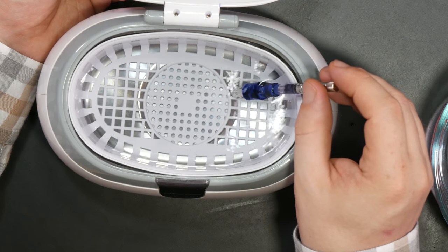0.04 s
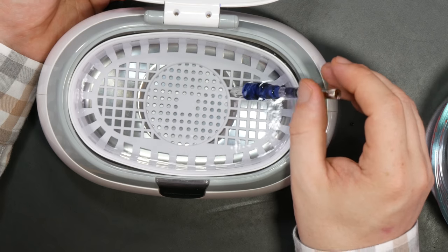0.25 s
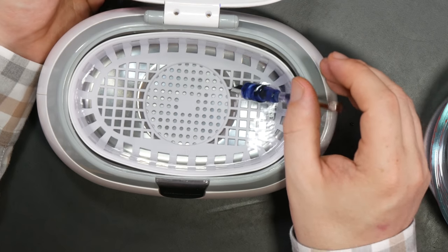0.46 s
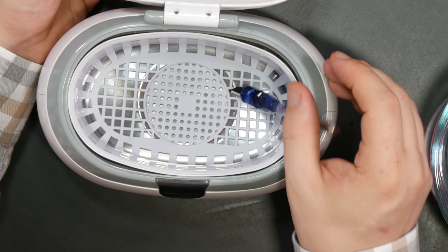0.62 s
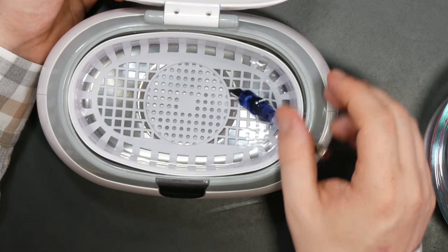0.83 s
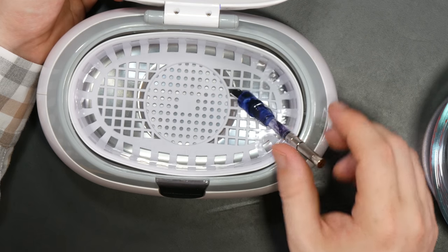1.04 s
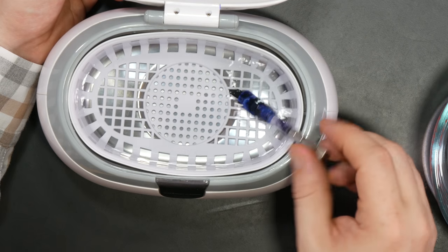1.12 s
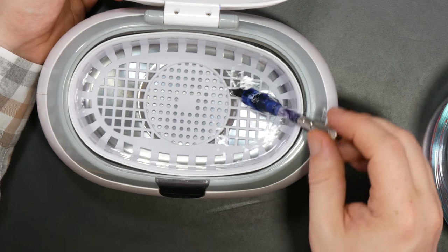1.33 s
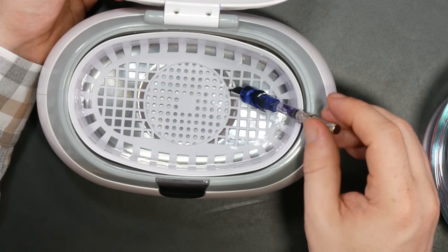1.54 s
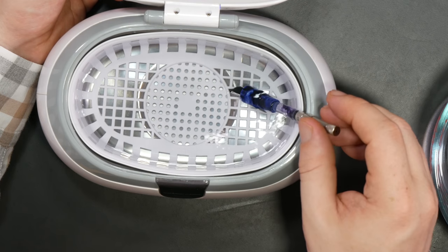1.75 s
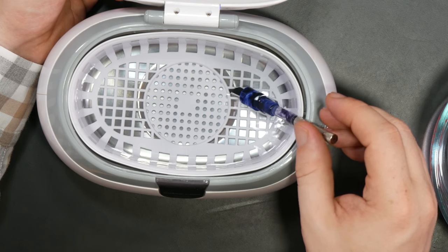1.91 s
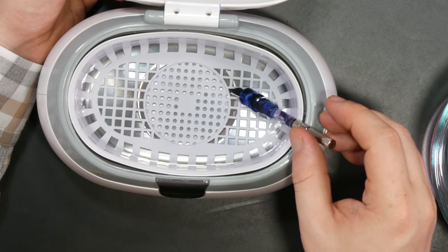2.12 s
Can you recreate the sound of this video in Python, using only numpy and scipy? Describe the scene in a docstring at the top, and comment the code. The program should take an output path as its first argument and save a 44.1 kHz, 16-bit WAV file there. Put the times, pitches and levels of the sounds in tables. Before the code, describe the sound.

Harsh electric sizzling from a water-filled ultrasonic cleaner runs throughout, its lower buzz shifting as a hand moves a pen in it. Small clicks, plops, faint scrapes and dull bumps; close and dry indoors.

```python
"""Hiss buzzing at the mains rate, with a touch and soft plops: a small ultrasonic cleaner, a pen held in its tank.
The drive swells once per mains cycle: each swell gates random bubble collapses into a burst of hiss,
adds a short whine, a nearly repeating noise pattern as rattle, and a kick to the tank's modes.
The hand adds rising-sine plops, noise touches, scrapes and bumps, and ringing notes.
A short noise tail makes the room; mains hum and room air lie beneath."""
import sys
import numpy as np
from scipy import signal
from scipy.fft import rfft, irfft, next_fast_len
from scipy.io import wavfile

SR = 44100
rng = np.random.default_rng(int(sys.argv[2]) if len(sys.argv) > 2 else 0)


def inscribe(sig):
    """Save sig as 16-bit PCM at rate SR to the path in sys.argv[1].

    A 1-D sig is mono; a 2-D sig holds one channel per row.
    Samples are clipped to [-1, 1] before scaling.
    """
    pcm = np.round(np.clip(np.atleast_2d(sig).T, -1, 1) * 32767)
    wavfile.write(sys.argv[1], SR, pcm.astype(np.int16))


N = 95829
T = np.arange(N) / SR

# Source levels are relative, ahead of the mix and room scaling. Spectra are relative densities.
# mains hum: [multiple of mains, level/dB]
HUM_HARMONICS = [(1, -87), (5, -88), (13, -79.5)]
# room air spectrum: [f/Hz, level/dB]
AIR_SPECTRUM = [(20, 0), (70, -3), (200, -11), (500, -18), (1500, 0), (8000, -24)]
# water plops: [t/s, level/dB, starting f/Hz]
PLOP_EVENTS = [(.009, -38, 289), (.013, -36.5, 697), (1.409, -49.5, 652), (1.432, -38.5, 392),
               (1.440, -41, 603)]
# pen touches the basket: [t/s, level/dB]
TOUCH_EVENTS = [(.003, -28.5), (0.367, -47.5), (1.336, -44), (1.408, -52), (1.432, -35), (1.554, -45.5)]
# touch spectrum: [f/Hz, level/dB]
TOUCH_SPECTRUM = [(100, -72), (260, -5), (700, 1.5), (1000, 2), (1300, -5), (1600, -2), (2250, -7),
                  (3000, -12), (6000, -4)]
# pen slides: [t/s, level/dB, width/s]
SCRAPE_EVENTS = [(0.528, -54, .05), (0.697, -53.5, 0.071), (1.428, -48.5, 0.053)]
# scrape spectrum: [f/Hz, level/dB]
SCRAPE_SPECTRUM = [(100, -20), (300, 1.5), (430, -4.5), (680, 3.5), (950, 0), (1500, -2), (2270, 9.5),
                   (2700, -24), (6000, -32)]
# hand bumps the case: [t/s, level/dB, bell width/s]
BUMP_EVENTS = [(0.466, -67, .012), (0.524, -52.5, 0.0078), (0.791, -59.5, 0.021), (1.167, -67.5, 0.018),
               (1.46, -61, 0.012), (1.546, -54, 0.028)]
# bump spectrum: [f/Hz, level/dB]
BUMP_SPECTRUM = [(25, -17), (60, -8), (120, 10.5), (200, -1), (330, -10), (600, -25), (2000, -61)]
# tank and basket notes set ringing by the pen: [t/s, level/dB, f/Hz, t60/s]
PING_EVENTS = [(.012, -52.5, 298.2, 0.55), (1.337, -32, 2236, 0.055), (1.435, -46, 302, .15)]
# tank modes: [f/Hz, level/dB, t60/s]
MODES = [(1690, -7, .018), (1830, 1, .02), (2290, -1, .022), (2520, -4, .02), (2800, -2, .022),
         (3180, 5, .03), (3900, 6, .014), (4230, 5, .014), (4650, 4, .014)]
# whine and high rattle over time: [t/s, level/dB]
RING_OVER_TIME = [(0.0, -43), (0.56, -36.5), (1.0, -43), (1.29, -46), (1.3, -37), (1.53, -38.5),
                  (1.63, -46), (1.86, -37.5), (2.15, -39.5), (2.17, -39)]
# low buzz over time, changing with the grip on the pen: [t/s, level/dB]
BUZZ_OVER_TIME = [(0.01, -40), (0.24, -43), (0.42, -37.5), (0.69, -39.5), (0.94, -51.5), (1.05, -45),
                  (1.15, -50.3), (1.2, -40.5), (1.25, -44), (1.42, -37.5), (1.55, -40.5), (1.64, -50.0),
                  (1.84, -46), (2.15, -45)]
# lowest part of the buzz over time: [t/s, level/dB]
DRONE_OVER_TIME = [(0.01, -39.5), (0.26, -60), (0.39, -43), (0.46, -52), (0.5, -42), (0.77, -48.5),
                   (0.84, -58), (0.97, -67.5), (1.47, -47.5), (1.64, -59), (1.77, -88), (1.85, -59.5),
                   (2.15, -61.5)]
# high rattle spectrum: [f/Hz, level/dB]
RATTLE_HIGH_SPECTRUM = [(2000, -46), (2900, -9), (3200, 2), (3400, -4), (3900, 6.5), (4200, 1), (4400, -1),
                        (4700, 2.5), (5100, -23.5), (7000, -43)]
# low rattle spectrum: [f/Hz, level/dB]
RATTLE_LOW_SPECTRUM = [(500, -44), (1000, -20), (1500, -14.5), (1800, 1), (2050, -2), (2300, 2),
                       (2850, -6.5), (3600, -12.5)]
# drone spectrum: [f/Hz, level/dB]
DRONE_SPECTRUM = [(60, -16), (200, -28), (300, -16), (500, -13), (750, -8), (950, -10), (1150, 2.5),
                  (1550, -3.5), (2200, -13)]
# cavitation strength over time: [t/s, level/dB]
CAVITATION_OVER_TIME = [(0.01, -21.5), (0.27, -22.5), (0.41, -21), (0.94, -23), (1.07, -22.1), (1.1, -23.5),
                        (1.49, -21), (1.57, -22), (1.67, -25.8), (1.74, -22.4), (1.8, -24), (1.87, -20.5),
                        (1.9, -23.5), (2.04, -19.5), (2.1, -23.5), (2.15, -22.5)]
# single bursts that flare up: [t/s, gain/dB]
FLARE_EVENTS = [(.038, 2.5), (.105, 1), (.172, 1.5), (.272, 1), (.405, 0.7), (.538, 0), (.572, 1.5),
                (1.472, 1.5), (1.572, 3), (1.588, 3.5), (1.722, 3.5), (1.955, 3.5)]
# hiss spectrum: [f/Hz, level/dB]
HISS_SPECTRUM = [(300, -54), (1200, -38), (2300, -23), (4100, -13), (5300, -16.5), (6000, -9), (6300, -12),
                 (7400, -10), (8000, -10.5), (9500, -6), (9950, -2), (10250, -2.7), (10700, 0),
                 (11450, -3.7), (12450, -3), (12850, -1.3), (13300, -2.8), (13750, -2.8), (14700, -6.5),
                 (15700, -8.3)]

MAINS_HZ, FIRST_SWELL_S = 60.026, 0.0052
ROOM_T60_S, ROOM_DELAY_S = 0.16, 0.007
HISS_ROOM_DB, TANK_ROOM_DB, HANDLING_ROOM_DB = -14.5, -10, -5
AIR_DB, CUTOFF_HZ = -82, 15820
PLOP_RISE_PER_S, PLOP_ATTACK_S, PLOP_DECAY_S = 17.5, 0.0013, 0.011  # rise: fraction of starting pitch
TOUCH_ATTACK_S, TOUCH_DECAY_S = 0.002, 0.016
SCRAPE_GRAINS_PER_S = 1100
RATTLE_HALF_S, RATTLE_LAG_S, RATTLE_TAIL_S, RATTLE_TAIL_DB = 0.0047, 0.0001, 0.009, -4.5
RATTLE_HIGH_DB, RATTLE_LOW_DB, DRONE_DB = -3, -4.5, -4.5
WHINE_HZ, WHINE_LEAD_S, WHINE_WIDTH_S, WHINE_DB = 3928, 0.0024, 0.0013, -2.5
KICK_LAG_S, KICK_DB, KICK_SPREAD = 0.003, -4.5, 0.17
BURST_WIDTH_S, BURST_SKIRT_S, SKIRT_LAG_S, SKIRT_DB = 0.0021, 0.0029, 0.00037, -2.5
SWITCH_ON_LEAD_S, SWITCH_RISE_S = 0.0048, 0.000083
COLLAPSES_PER_S, COLLAPSE_SPREAD_DB = 22000, 2.5
BURST_SPREAD_DB, BURST_PATCHY_DB, HISS_DB = 0.25, 0.9, -2


def from_db(db):
    """Decibels to gain."""
    return 10 ** (np.asarray(db) / 20)


def rms_one(x):
    """Scale to unit power."""
    return x / np.sqrt(np.mean(x ** 2) + 1e-20)


def level(rows):
    """Gain over time, interpolated in dB."""
    return from_db(np.interp(T, *np.transpose(rows)))


def bell(x, width):
    """Gaussian of height 1 and standard deviation width."""
    return np.exp(-.5 * (x / width) ** 2)


def noise():
    """White noise over the whole scene."""
    return rng.standard_normal(N)


def colour(x, spectrum):
    """Minimum-phase filter from a folded cepstrum; output rms 1."""
    size = 2 * next_fast_len(N)
    hz, db = np.transpose(spectrum)
    bins_hz = np.arange(size // 2 + 1) * SR / size
    gain = from_db(np.interp(np.log(bins_hz + 1), np.log(hz), db))
    cepstrum = irfft(np.log(gain))
    cepstrum[1:size // 2] *= 2
    cepstrum[size // 2 + 1:] = 0
    response = np.exp(rfft(cepstrum))
    return rms_one(irfft(rfft(x, size) * response)[:N])


def ring(kicks, hz, t60_s):
    """One decaying mode: a two-pole resonator."""
    radius = from_db(-60 / (t60_s * SR))
    w = 2 * np.pi * hz / SR
    return signal.lfilter([0, np.sin(w)], [1, -2 * radius * np.cos(w), radius ** 2], kicks + 1e-18)


def in_room(x, wet_db):
    """Add a decaying noise tail, scaled to about the same power."""
    t = T[:SR // 2]
    tail = rng.standard_normal(len(t)) * from_db(-60 * t / ROOM_T60_S) * (t > ROOM_DELAY_S)
    wet = signal.fftconvolve(x, tail / np.linalg.norm(tail))[:N]
    return (x + from_db(wet_db) * wet) / np.hypot(1, from_db(wet_db))


def background():
    """Steady mains harmonics and coloured-noise room air."""
    hum = np.zeros(N)
    for multiple, db in HUM_HARMONICS:
        turns = multiple * MAINS_HZ * T + rng.random()
        hum += from_db(db) * rms_one(np.sin(2 * np.pi * turns))
    return hum + from_db(AIR_DB) * colour(noise(), AIR_SPECTRUM)


def bumps():
    """Dull bumps on the case: low noise under bell envelopes."""
    envelope = sum(from_db(db) * bell(T - s, width_s) for s, db, width_s in BUMP_EVENTS)
    return envelope * colour(noise(), BUMP_SPECTRUM)


def scrapes():
    """Sliding pen: sparse random grains under flat-topped envelopes."""
    envelope = sum(from_db(db) * bell(((T - s) / width_s) ** 2, 1) for s, db, width_s in SCRAPE_EVENTS)
    grains = noise() * (rng.random(N) < SCRAPE_GRAINS_PER_S / SR)
    return envelope * colour(grains, SCRAPE_SPECTRUM)


def touches():
    """Light contacts on the basket: noise with a short attack and decay."""
    envelope = np.zeros(N)
    for s, db in TOUCH_EVENTS:
        attack = np.clip((T - s) / TOUCH_ATTACK_S, 0, 1)
        envelope += from_db(db) * attack * np.exp(-abs(T - s) / TOUCH_DECAY_S)
    return envelope * colour(noise(), TOUCH_SPECTRUM)


def pings():
    """Struck notes of tank and basket: one impulse into one mode each."""
    return sum(from_db(db) * ring(np.arange(N) == int(s * SR), hz, t60_s)
               for s, db, hz, t60_s in PING_EVENTS)


def plops():
    """Pockets of air ring briefly, rising linearly in pitch."""
    out = np.zeros(N)
    for s, db, hz in PLOP_EVENTS:
        age = np.maximum(T - s, 0)
        envelope = (1 - np.exp(-age / PLOP_ATTACK_S)) * np.exp(-age / PLOP_DECAY_S)
        turns = hz * (age + .5 * PLOP_RISE_PER_S * age ** 2)
        out += 2 * from_db(db) * envelope * np.sin(2 * np.pi * turns)
    return out


def mains():
    """Mains cycle number, and seconds from the crest of its swell."""
    turns = (T - FIRST_SWELL_S) * MAINS_HZ
    cycle = np.round(turns).astype(int)
    return cycle, (turns - cycle) / MAINS_HZ


def rattle(cycle, offset_s, spectrum, memory_s, rough):
    """Driven chatter: a noise pattern that drifts slowly from cycle to cycle, plus fresh noise."""
    place = ((offset_s + .5 / MAINS_HZ) * SR).astype(int)
    pattern = rng.standard_normal((cycle[-1] + 1, place.max() + 1))
    keep = np.exp(-1 / (MAINS_HZ * memory_s))
    for k in range(1, len(pattern)):
        pattern[k] = keep * pattern[k - 1] + np.sqrt(1 - keep ** 2) * pattern[k]
    driven = np.exp(-((offset_s - RATTLE_LAG_S) / RATTLE_HALF_S) ** 8)
    since_off_s = (offset_s - RATTLE_LAG_S - RATTLE_HALF_S) % (1 / MAINS_HZ)
    tail = from_db(RATTLE_TAIL_DB) * np.exp(-since_off_s / RATTLE_TAIL_S)
    chatter = pattern[cycle, place] + rough * noise()
    return colour(np.maximum(driven, tail) * chatter, spectrum)


def whine(offset_s):
    """Short sine as the drive rises, restarting in phase each cycle."""
    envelope = bell(((offset_s + WHINE_LEAD_S) / WHINE_WIDTH_S) ** 2, 0.48)
    return rms_one(envelope * np.sin(2 * np.pi * WHINE_HZ * offset_s))


def kicked_modes(cycle, offset_s):
    """Tank modes kicked once per cycle as the drive lets go."""
    kicks = np.maximum(0, 1 - abs(offset_s - KICK_LAG_S) * SR)
    out = np.zeros(N)
    for k, (hz, db, t60_s) in enumerate(MODES):
        strength = 1 + KICK_SPREAD * rng.standard_normal(cycle[-1] + 1)
        out += (-1) ** k * from_db(db) * ring(kicks * strength[cycle], hz, t60_s)  # alternating sign
    return rms_one(out)


def tank(cycle, offset_s):
    """Tank body: whine and high rattle, kicked modes and low rattle, drone."""
    high_rattle = rattle(cycle, offset_s, RATTLE_HIGH_SPECTRUM, memory_s=0.19, rough=0.85)
    low_rattle = rattle(cycle, offset_s, RATTLE_LOW_SPECTRUM, memory_s=0.14, rough=0.32)
    drone = from_db(DRONE_DB) * rattle(cycle, offset_s, DRONE_SPECTRUM, memory_s=0.98, rough=0.05)
    high = from_db(WHINE_DB) * whine(offset_s) + from_db(RATTLE_HIGH_DB) * high_rattle
    low = from_db(KICK_DB) * kicked_modes(cycle, offset_s) + from_db(RATTLE_LOW_DB) * low_rattle
    return level(RING_OVER_TIME) * high + level(BUZZ_OVER_TIME) * low + level(DRONE_OVER_TIME) * drone


def tint(x, cycle):
    """Vary the spectrum per burst: random gains on overlapping triangular bands."""
    centres_hz = np.linspace(0, SR / 2, 10)
    bins_hz, spectrum = np.fft.rfftfreq(N, 1 / SR), rfft(x)
    out = np.zeros(N)
    for centre_hz in centres_hz:
        weight = np.maximum(0, 1 - abs(bins_hz - centre_hz) / centres_hz[1])
        gain = from_db(BURST_PATCHY_DB * rng.standard_normal(cycle[-1] + 1))
        out += irfft(spectrum * weight, N) * gain[cycle]
    return out


def cavitation(cycle, offset_s):
    """Dense random bubble collapses, gated by each swell; strength and tint vary per burst."""
    burst_db = BURST_SPREAD_DB * rng.standard_normal(cycle[-1] + 1)
    for s, db in FLARE_EVENTS:
        burst_db[cycle[int(s * SR)]] += db
    skirt = from_db(SKIRT_DB) * bell(offset_s - SKIRT_LAG_S, BURST_SKIRT_S)
    switch_on = 1 + np.tanh((offset_s + SWITCH_ON_LEAD_S) / SWITCH_RISE_S)
    swell = (bell(offset_s, BURST_WIDTH_S) + skirt) * switch_on
    sizes = noise() * from_db(COLLAPSE_SPREAD_DB * noise())
    collapses = sizes * (rng.random(N) < COLLAPSES_PER_S / SR)
    bursts = collapses * swell * from_db(burst_db)[cycle]
    hiss = colour(tint(bursts, cycle), HISS_SPECTRUM)
    return from_db(HISS_DB) * level(CAVITATION_OVER_TIME) * hiss


def scene():
    """Cleaner and hand in the room, over the background; one channel."""
    cycle, offset_s = mains()
    hand = in_room(plops() + pings() + touches() + scrapes() + bumps(), HANDLING_ROOM_DB)
    body = in_room(tank(cycle, offset_s), TANK_ROOM_DB)
    hiss = in_room(cavitation(cycle, offset_s), HISS_ROOM_DB)
    return (background() + hand + body + hiss)[None]


def record(dry):
    """Steep linear-phase low-pass."""
    taps = signal.firwin(801, CUTOFF_HZ, window=("kaiser", 9), fs=SR)
    return signal.fftconvolve(dry, taps[None], mode="same")


dry = scene()
out = record(dry)
inscribe(out)
```